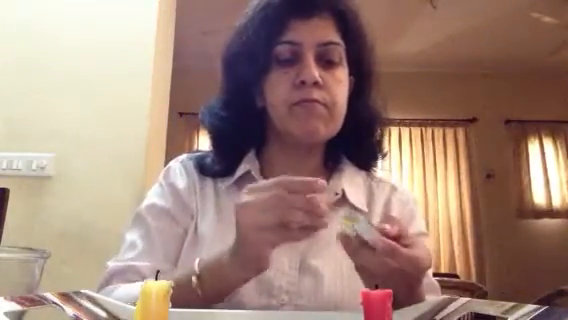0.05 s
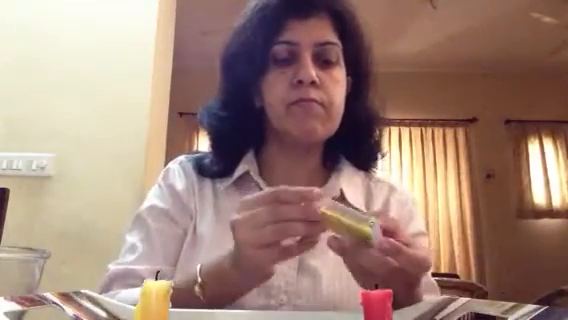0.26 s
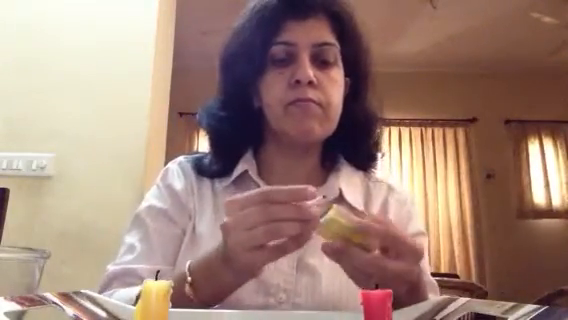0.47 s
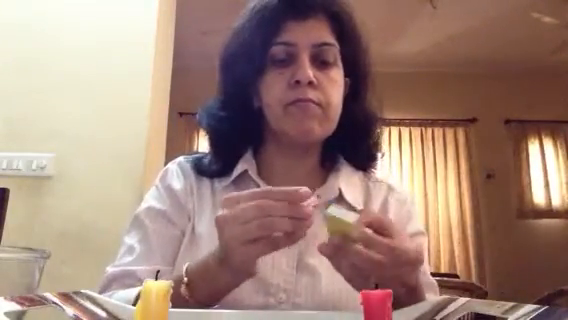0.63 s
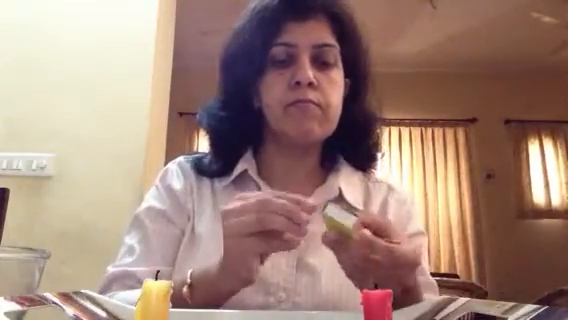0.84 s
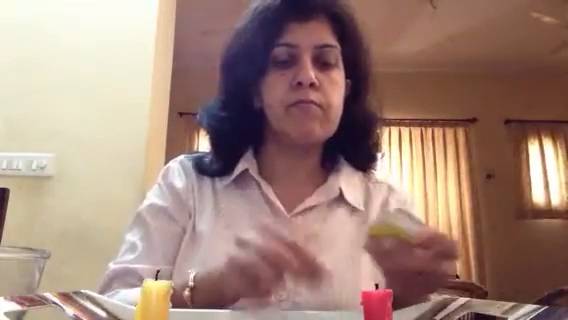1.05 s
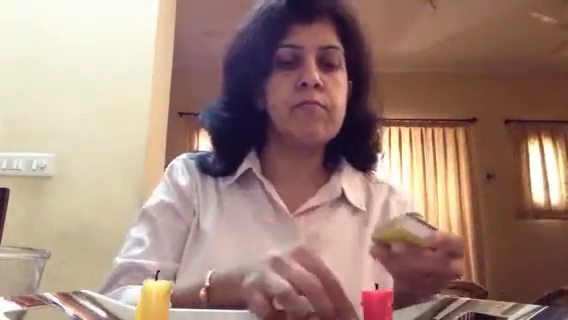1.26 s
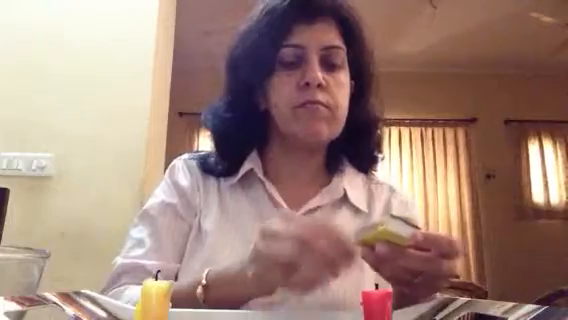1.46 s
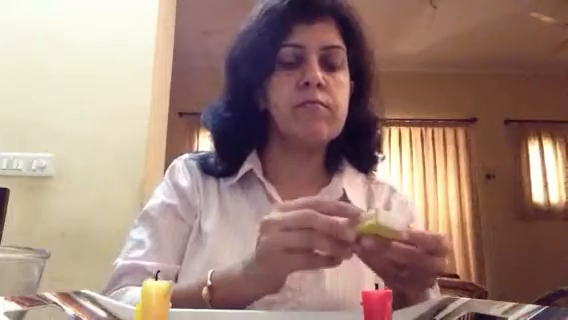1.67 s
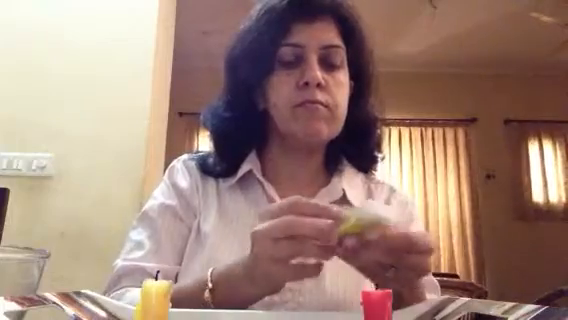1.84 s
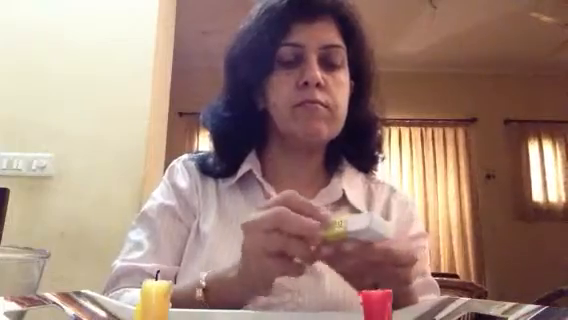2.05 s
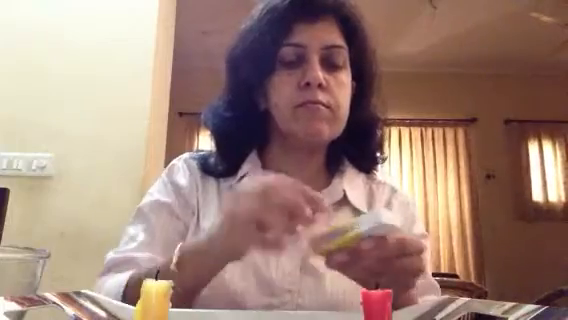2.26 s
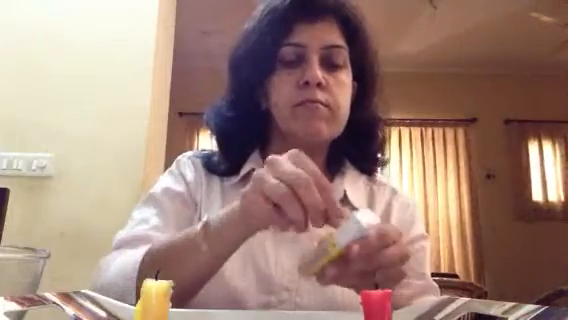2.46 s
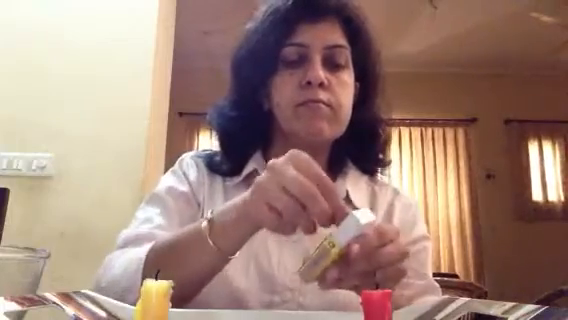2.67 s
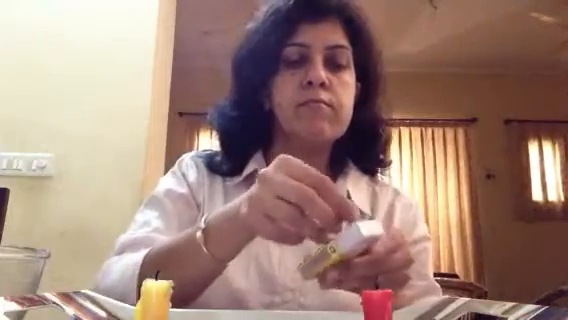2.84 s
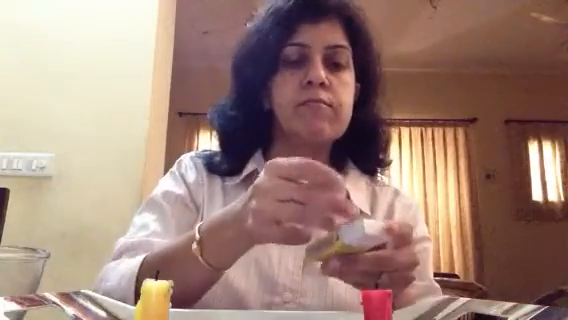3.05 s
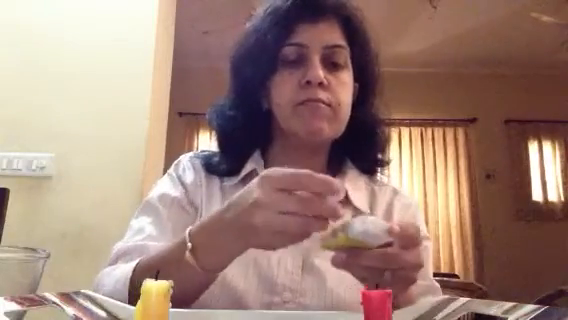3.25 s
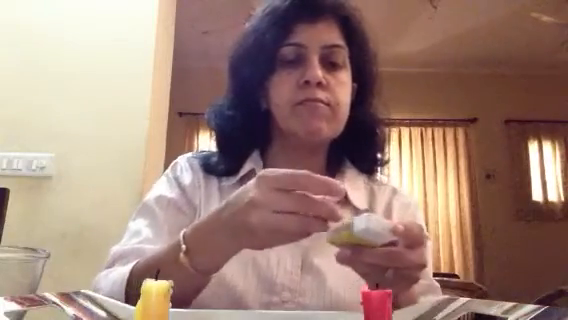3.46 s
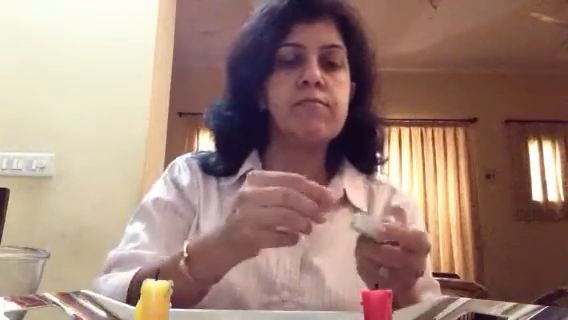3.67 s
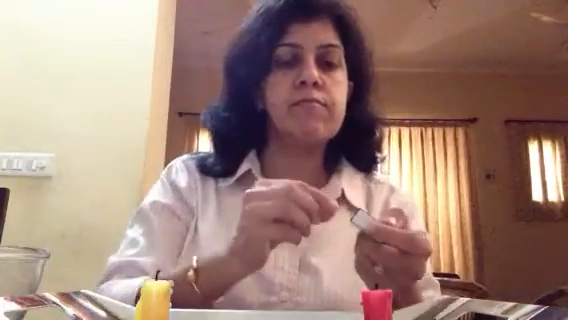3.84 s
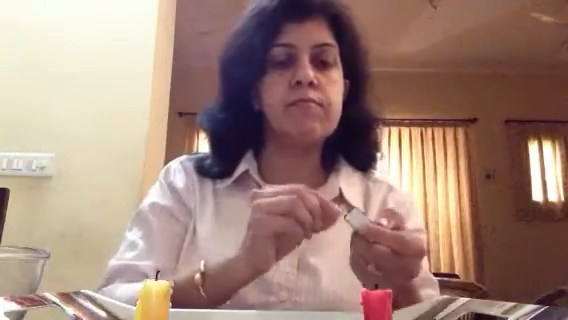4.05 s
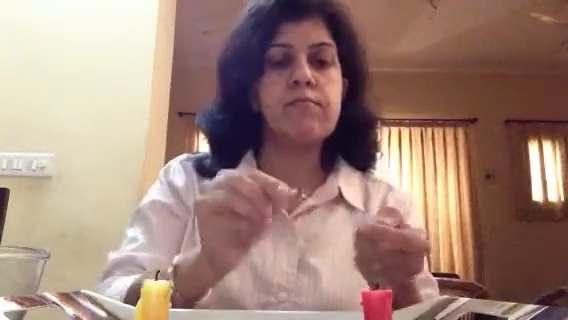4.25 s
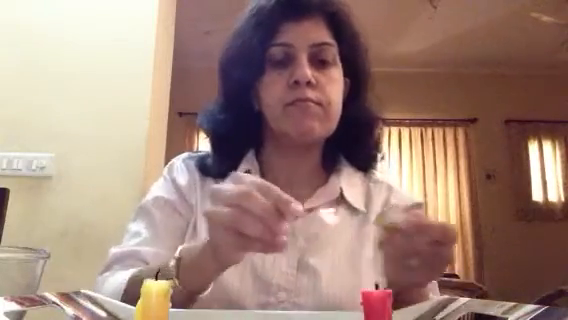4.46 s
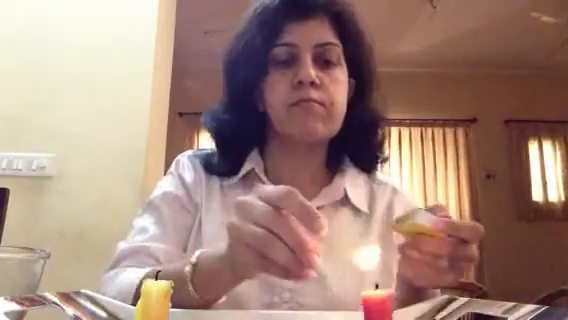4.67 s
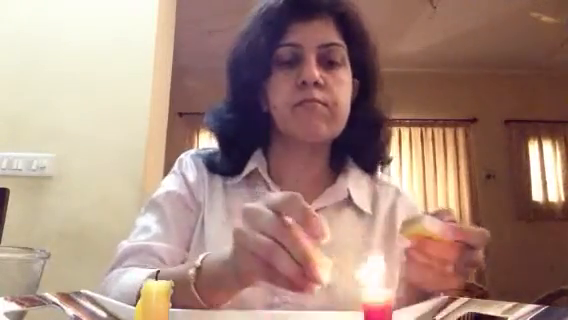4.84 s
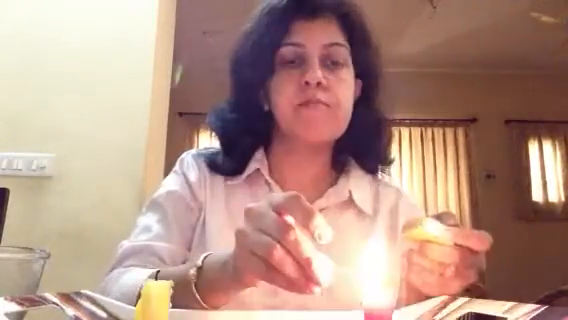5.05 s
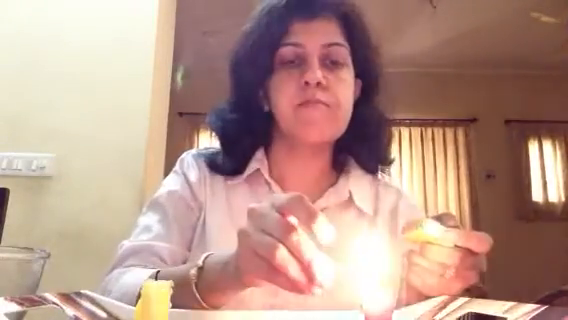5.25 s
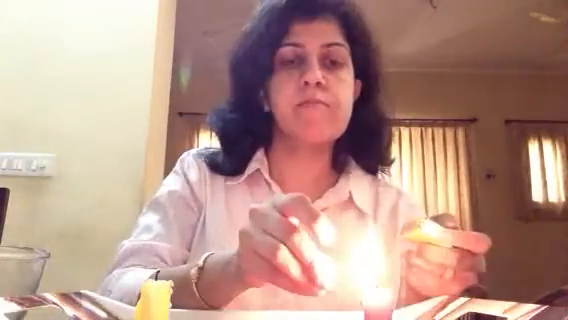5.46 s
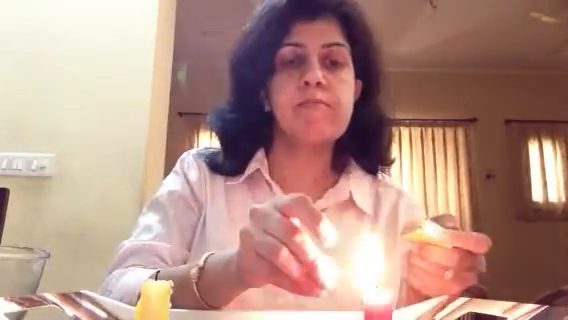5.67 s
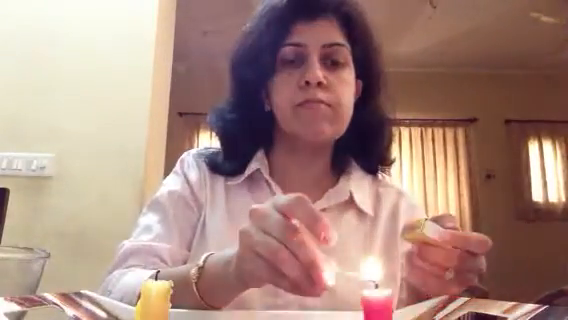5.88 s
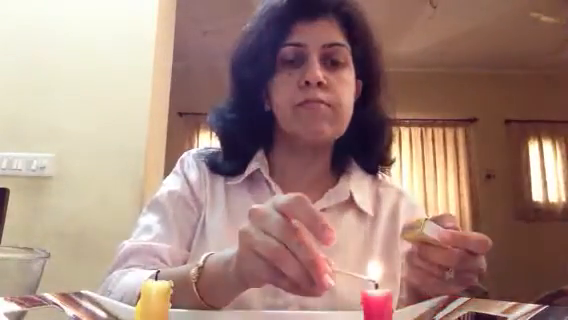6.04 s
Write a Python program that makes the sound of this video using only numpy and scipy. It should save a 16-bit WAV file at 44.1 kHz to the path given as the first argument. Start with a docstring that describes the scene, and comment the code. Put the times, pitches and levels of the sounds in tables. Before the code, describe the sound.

Small cardboard clicks and rubs lead to one sharp match strike, a brief fizz and a quietly crackling flame indoors.

```python
"""At a table in a hard-walled room, fingers rub and tap a cardboard matchbox, slide it open and pick a match.
The head snaps over the striker with a sharp crack, fizzes, burns with a fine hiss of escaping gas
and dies down in tiny crackles as a candle wick catches with a soft whoosh.
Behind it water sloshes in even strokes, like a washing machine in the next room,
over the murmur of the house, a thin motor whine and a brief, faint whistle."""
import sys
import numpy as np
from scipy import signal
from scipy.fft import rfft, irfft
from scipy.io import wavfile
from scipy.ndimage import uniform_filter1d

SR = 44100
rng = np.random.default_rng(int(sys.argv[2]) if len(sys.argv) > 2 else 0)


def store_wav(level_fs):
    """Save 16-bit WAV to argv[1]."""
    pcm = np.round(np.clip(np.atleast_2d(level_fs), -1, 1) * 32767)
    wavfile.write(sys.argv[1], SR, pcm.T.astype(np.int16))


N = 269362

# resonances (pitches it likes to ring at) of the box gripped for the strike: f/Hz, width/Hz, level/dB
GRIPPED_BOX_MODES = [(950, 90, -3.5), (1290, 130, 5), (1810, 260, 3)]


def undb(db):
    """Turn decibels into a factor to multiply by."""
    return 10 ** (np.asarray(db) / 20)


def unit(x):
    """Scale a signal to an average strength (rms) of one."""
    return x / np.sqrt(np.mean(x ** 2))


def walk(rate):
    """A random curve that glides to a new value `rate` times a second, with a spread near one."""
    step = int(SR / rate)
    stairs = np.repeat(rng.standard_normal(N // step + 1), step)
    return unit(uniform_filter1d(stairs, step)[:N])


def add(track, start, sound):
    """Mix a sound into a track at a time in seconds."""
    i = int(start * SR)
    track[i:i + len(sound)] += sound[:N - i]


def colour(x, points, size=4096):
    """Shape bass and treble along a curve of (f/Hz, level/dB) points; only the curve's shape counts."""
    hz, db = np.transpose(points)
    f = np.maximum(np.arange(size // 2 + 1) * SR / size, 1)
    cepstrum = irfft(np.log(undb(np.interp(np.log(f), np.log(hz), db))))
    cepstrum[1:size // 2] *= 2  # folded forward, so the filter never rings before a sound
    cepstrum[size // 2 + 1:] = 0
    response = irfft(np.exp(rfft(cepstrum)))
    return signal.fftconvolve(x, response / np.linalg.norm(response))[:N]


def ring(x, modes):
    """Let a signal ring an object's resonances, given as (f/Hz, width/Hz, level/dB)."""
    return sum(undb(db) * signal.lfilter(*signal.iirpeak(hz, hz / width, fs=SR), x)
               for hz, width, db in modes)


def grit(spread_db):
    """Grainy noise: dense tiny clicks of uneven size, none far above the rest."""
    size = np.minimum(rng.standard_normal(N), 2)
    return unit(rng.standard_normal(N) * undb(spread_db * size))


def swell(middle, half_length):
    """A bell-shaped rise and fall in loudness; times in seconds."""
    return np.exp(-((np.arange(N) / SR - middle) / half_length) ** 2 / 2)


def envelope(start, attack, hold, release, sag):
    """Loudness rises straight, sinks by `sag` dB a second while held, then dies away; times in seconds."""
    age = np.arange(N) / SR - start
    held = np.maximum(age - attack, 0)
    rise = np.clip(age / attack, 0, 1)
    return rise * undb(-sag * np.minimum(held, hold)) * np.exp(-np.maximum(held - hold, 0) / release)


def scatter(start, end, per_s, db, spread_db):
    """List (t/s, level/dB) of small events, each at a random moment in its own slice of the span."""
    count = max(int((end - start) * per_s), 1)
    chance = rng.random((64, 2))[:count]
    return [(start + (end - start) * (k + when) / count, db + spread_db * (2 * size - 1))
            for k, (when, size) in enumerate(chance)]


def house():
    """The house murmurs steadily, with the thin whine of a motor."""
    # tone of the murmur: f/Hz, level/dB
    murmur_tone = [(18, -86), (30, -76.5), (111, -10.5), (237, -3.5), (359, -4.5), (443, -11), (505, -16),
                   (639, -14.5), (1170, -23), (1820, -25.5), (2180, -28), (2620, -25.5), (2990, -29),
                   (15500, -31.5)]
    # pitches of the motor: f/Hz, width/Hz, level/dB
    motor_modes = [(451, 3.45, -19), (1450, 12, -3), (1790, 7.4, 9), (2088, 17, 1.5), (2160, 14.7, -7)]
    whine = unit(ring(rng.standard_normal(N), motor_modes))
    murmur = colour(rng.standard_normal(N), murmur_tone)
    return undb(-61.5) * murmur + undb(-77.5) * whine


def rubs():
    """Paper fibres catch and slip under each slide; a firm finger also rings the box wall."""
    # fingers and tray sliding over cardboard: middle t/s, level/dB, half length/s, wall ring/dB
    slides = [(0.2, -71.5, 0.19, 13.5), (0.364, -55.5, 0.016, 10), (0.615, -62.5, 0.025, 13),
              (.686, -64, 0.018, 17.5), (1.558, -66, 0.011, 17), (1.717, -56, 0.027, 7),
              (1.865, -58, 0.03, 8), (2.015, -50.5, 0.028, -2), (2.166, -59.5, 0.029, 13.5),
              (2.54, -56, 0.071, 8), (2.84, -56.5, 0.035, 9), (3.05, -65, .018, 9), (3.14, -63.5, 0.035, 5),
              (3.744, -54.5, 0.082, -5), (3.801, -56.5, 0.022, 15.5)]
    # tone of the rubbing: f/Hz, level/dB
    rub_tone = [(500, -8), (1300, -2.5), (2600, 6), (4000, -1), (7000, 1.5), (12000, 2), (15500, -3)]
    # resonances of the box wall: f/Hz, width/Hz, level/dB
    wall_modes = [(1296, 150, -4), (1813, 260, 2), (2550, 130, -19)]
    fibres = grit(spread_db=4.5) * unit(undb(2.2 * walk(170)))
    on_surface, on_wall = np.zeros(N), np.zeros(N)
    for middle, db, half_length, wall_db in slides:
        pressure = undb(db) * swell(middle, half_length)
        on_surface += pressure
        on_wall += undb(wall_db) * pressure
    friction = colour(fibres * on_surface, rub_tone)
    return undb(-4) * friction + undb(-1) * ring(fibres * on_wall, wall_modes)


def contacts(hits, tone, box_modes, scuff, drag_share, body_db):
    """Each hit drags briefly, snaps and scuffs to rest, ringing the cardboard and a matchstick."""
    # resonances of a matchstick: multiple of its pitch, width/Hz, level/dB
    stick_modes = [(1, 620, 4), (1.39, 990, -1.5)]
    edge, body, sticks = np.zeros(N), np.zeros(N), np.zeros(N)
    snap = SR // 40  # the sample where the drag ends
    t = np.arange(-snap, snap) / SR
    for when, db, length, box_db, tilt_db, stick_hz, stick_db in hits:
        fade_s = np.where(t < 0, drag_share * length, length)
        push = scuff * rng.standard_normal(len(t)) * np.exp(-np.abs(t) / fade_s)
        push[snap] = 1
        grip = 1 + 0.027 * rng.uniform(-0.74, 1)  # the fingers detune the box a little each time
        box = [(hz * grip, width, level + tilt_db * np.log2(hz / 1900)) for hz, width, level in box_modes]
        stick = [(stick_hz * ratio, width, level) for ratio, width, level in stick_modes]
        add(edge, when + t[0], undb(db) * push)
        add(body, when + t[0], undb(db + box_db) * ring(push, box))
        add(sticks, when + t[0], undb(db + stick_db) * ring(push, stick))
    return colour(edge, tone) + undb(body_db) * body + sticks


def clicks():
    """Tray and matches catch, then snap against the box; the fingers tick lightly on it in between."""
    # tray and matches hitting the box:
    # t/s, level/dB, scuff length/s, box ring/dB, box treble tilt/(dB per octave), stick f/Hz, stick ring/dB
    snaps = [(.581, -50.5, 0.0014, 12, -6, 5600, -5), (.665, -52, 0.0018, 9, -7, 5400, -4),
             (.688, -50.5, 0.0017, 11, -10, 5400, -4), (.711, -47, .0012, 4, -9, 5200, -1),
             (1.3748, -28, .0013, -15, -8, 5600, -13), (1.433, -31.5, 0.0023, -16, -8, 4750, -14),
             (1.491, -42.5, .002, -14, 0, 4750, 1), (1.909, -33, 0.0043, -0.5, -4, 6700, -4),
             (1.928, -26, 0.0018, -7, 4, 5400, 2), (1.9321, -20.5, 0.0011, -8, 8, 5450, 4),
             (1.9359, -25, 0.0015, -12, 5, 7000, 7.5), (2.4657, -41.5, 0.0021, 5, 6, 5400, 13),
             (2.4774, -31.5, .0026, 6, -5, 5170, 11.5), (2.545, -45, 0.0026, 9.5, -7, 5600, 3),
             (2.6, -45, 0.0019, -6, 0, 8900, 7), (2.6776, -22.5, 0.0022, -10, 12, 7100, 1.5),
             (2.742, -36, 0.0015, 3.5, -7, 5600, 1), (3.018, -45.5, .0018, 4, 5, 5500, 11),
             (3.047, -53, 0.0042, 9, 13, 4300, 8), (3.178, -51, 0.0044, 7, 3, 4600, 1),
             (3.919, -50, .002, 7, 0, 5500, -6), (4.002, -50.5, .0015, 6.5, -5.5, 5600, 0),
             (4.027, -50, .0015, 7, -2, 4600, -2)]
    # spells when the fingers work the box: from t/s, to t/s
    handling = [(.05, 0.74), (1.45, 1.7), (2.5, 3.2), (3.85, 3.96)]
    # tone of a click: f/Hz, level/dB
    click_tone = [(150, -20), (600, -2), (1200, -5.5), (3700, -2), (5500, 0.5), (7200, 3), (8800, 0),
                  (12500, 1.2), (15500, 0)]
    # resonances of the loosely held box: f/Hz, width/Hz, level/dB
    loose_box_modes = [(980, 74, -6), (1656, 160, -4), (1970, 330, 2.5), (2554, 380, -1),
                       (3180, 1200, -20.5)]
    # a longer, softer catch comes just before each snap, and stands out more the firmer the snap is
    lead_s, stretch, firm_db = 0.0042, 2.75, -17.5
    catches = [(when - lead_s, db - 8 + 0.5 * (db - firm_db), length * stretch, *timbre)
               for when, db, length, *timbre in snaps]
    ticks = [(when, db, 0.003, 9.5, 0, 6000, -1)  # same columns as the snaps
             for start, end in handling
             for when, db in scatter(start, end, per_s=14, db=-58.5, spread_db=-0.5)]
    hits = snaps + catches + ticks
    box = undb(-3) * contacts(hits, click_tone, loose_box_modes, scuff=0.46, drag_share=0.38, body_db=10)
    bass_cut = signal.butter(2, 590, "high", fs=SR, output="sos")  # a small box gives off little bass
    return signal.sosfilt(bass_cut, box)


def washer():
    """Each stroke throws a splash, while the water heaves in the hollow tub and settles."""
    # strokes of the washer: t/s, heave/dB, splash/dB, sag of the heave/(dB per s)
    strokes = [(0.287, -48.5, -64, 29.5), (1.137, -47.5, -59, 32), (1.979, -49, -60, 24),
               (2.791, -49.5, -59, 26.5), (3.627, -52, -61.5, 17), (4.5, -53.5, -64.5, 17),
               (5.345, -47, -77, 31.5)]
    # tones of the heaving water and of the splash: f/Hz, level/dB
    slosh_tone = [(50, -25.5), (85, -27), (115, -7.5), (220, -6), (300, 0.5), (430, -3.5), (540, -8.5),
                  (800, -10), (1200, -22.5), (2500, -25), (8000, -42.5)]
    splash_tone = [(400, -7), (900, 7.5), (2500, -2), (5000, -3), (9000, -6.5), (11000, -12.5),
                   (15000, -24)]
    # hollow resonances of the tub: f/Hz, width/Hz, level/dB
    tub_modes = [(226.2, 41, -2.5), (302, 39, -3.5), (387.6, 19.5, -1), (437.6, 15, 0.4), (672, 36, -8),
                 (804, 28, -5), (936, 22, -8)]
    t = np.arange(N) / SR
    water = rng.standard_normal(N) * undb(0.7 * walk(24.98))
    hollow = unit(ring(ring(water, tub_modes), tub_modes))
    slosh = unit(unit(colour(water, slosh_tone)) + undb(-2.5) * hollow)
    heave, spray = np.zeros(N), np.zeros(N)
    for when, heave_db, splash_db, sag in strokes:
        heave += undb(heave_db) * envelope(when - 0.029, attack=0.14, hold=0.36, release=0.14, sag=sag)
        onset = np.clip((t - when) / 0.019, 0, 1)
        spray += undb(splash_db) * onset * np.exp(-((t - when - 0.09) / 0.26) ** 2)
    return heave * slosh + spray * colour(grit(spread_db=6.5), splash_tone)


def whistle():
    """A thin, distant tone wavers, sinks a little and fades."""
    middle_s, pitch_hz, fall_hz_per_s = 1.9, 1042, 72
    age = np.arange(N) / SR - middle_s
    phase = 2 * np.pi * (pitch_hz * age - fall_hz_per_s * age ** 2 / 2) + 0.5 * walk(30)
    return undb(-67.5 + 2 * walk(20)) * swell(middle_s, half_length=0.4) * np.sin(phase)


def knocks():
    """Tray judders, hand knocks and pops of the match head: each is a dull rattle and a fading tone."""
    # the tray juddering against its sleeve: t/s, level/dB, f/Hz
    judders = [(1.906, -38, 2480), (1.925, -33, 2690), (1.9283, -30.5, 2370), (1.936, -29, 2570)]
    # the hand bumping the box: t/s, level/dB, share of the full ring time
    bumps = [(2.435, -37, 0.42), (2.743, -47, .5), (4.8683, -30, 0.89)]
    # tones a bump sets ringing: f/Hz, level/dB, ring time/s
    bump_modes = [(604, -14.5, 0.021), (970, -7, 0.0078), (1122, -3, 0.0084), (1340, -11, 0.0071),
                  (1865, -5, 0.0034), (2250, -8, .003), (2790, -5, 0.0028), (4100, -11, .003),
                  (5000, -11, .003)]
    # dull pops of the head as it lights: t/s, level/dB, f/Hz
    pops = [(4.217, -25, 1510), (4.249, -34, 1500), (4.273, -30.5, 1370), (4.316, -33, 1710),
            (4.342, -31.5, 760)]
    pop_ring_s, judder_ring_s = 0.0018, 0.0042
    notes = [(when, db + mode_db, hz, share * ring_s)
             for when, db, share in bumps for hz, mode_db, ring_s in bump_modes]
    notes += [(*pop, pop_ring_s) for pop in pops]
    notes += [(*judder, judder_ring_s) for judder in judders]
    track, t = np.zeros(N), np.arange(SR // 2) / SR
    for when, db, hz, ring_s in notes:
        noise = signal.lfilter(*signal.iirpeak(hz, 1.3, fs=SR), rng.standard_normal(len(t)))
        rattle = unit(noise) * np.exp(-t / 0.0044)
        tone = np.sin(2 * np.pi * (hz * t + rng.random()))
        add(track, when, undb(db) * np.exp(-t / ring_s) * (0.51 * tone + 0.26 * rattle))
    return track


def strike():
    """The match head snaps over the striker and rings the gripped box: one sharp crack."""
    # snaps of the head:
    # t/s, level/dB, scuff length/s, box ring/dB, box treble tilt/(dB per octave), stick f/Hz, stick ring/dB
    snaps = [(4.1764, -6.5, 0.0011, 0, 3, 4700, -6.5), (4.1794, -0.5, 0.00054, -7, -0.5, 9000, -13),
             (4.1801, -9.5, 0.0041, -6.5, 19, 9200, -2)]
    # tone of the crack: f/Hz, level/dB
    crack_tone = [(80, -47), (250, -13.5), (600, -9.5), (1500, -2), (3500, -6), (6000, -3.5), (8500, 0),
                  (13500, 3.5), (15500, 0)]
    crack = contacts(snaps, crack_tone, GRIPPED_BOX_MODES, scuff=0.15, drag_share=0.067, body_db=-2.5)
    return undb(3) * crack


def ignition():
    """The tip flashes in a bright fizz that rings the box, then smoulders and spits as the fire spreads."""
    # spits of the head: middle t/s, level/dB, half length/s
    spits = [(4.445, -57, 0.005), (4.473, -61, 0.004), (4.523, -54.5, 0.004)]
    # tones of the fizz and of the smoulder: f/Hz, level/dB
    fizz_tone = [(80, -37), (250, 7), (700, -11), (1500, -9.5), (2250, -4), (3200, -2), (6000, -7.5),
                 (8500, 1), (13500, -0.5), (15300, 1.5), (17000, -10)]
    smoulder_tone = [(80, -24), (300, 7.5), (950, 6), (1300, -1), (1900, 3), (3400, -8.5), (5300, 0),
                     (8000, 2), (10400, 1), (11800, -7), (15000, -5)]
    rasp = undb(1.8 * walk(260))
    chatter = unit(undb(3.5 * walk(140)))
    flash = undb(-38) * envelope(4.191, attack=0.009, hold=0.0059, release=0.0046, sag=0)
    fizz = undb(-45) * envelope(4.178, attack=0.0046, hold=0.1, release=0.067, sag=29)
    burst = grit(spread_db=3.5) * rasp * (flash + fizz)
    box = undb(2.5) * ring(burst * chatter, GRIPPED_BOX_MODES)
    glow = undb(-57) * envelope(4.36, attack=0.05, hold=0.16, release=0.1, sag=8) * undb(1.5 * walk(150))
    spitting = sum(undb(db) * swell(middle, half_length) for middle, db, half_length in spits)
    smoulder = colour(grit(spread_db=5.5) * (glow + spitting), smoulder_tone)
    return colour(burst, fizz_tone) + box + smoulder


def flare():
    """Gas sizzles out of the burning head over a soft roar, sputtering more as the head burns out."""
    # tones of the hiss and of the roar: f/Hz, level/dB
    hiss_tone = [(200, -15), (450, 4), (620, 11), (780, 5.5), (950, 9.5), (1350, -2.5), (1650, 3),
                 (1880, 8), (2200, -0.5), (2850, 3.5), (4100, -6.5), (4550, -2), (5000, -4), (6500, -1.5),
                 (7350, 2.5), (7950, -1.5), (8700, 3), (9200, 1), (9950, 3.5), (11000, 1), (15500, -1.5)]
    roar_tone = [(85, -38), (130, -13), (230, 2), (330, -11.5), (1000, -31)]
    burning_out = envelope(5.2, attack=0.079, hold=1, release=1, sag=0)
    sputter = undb((1.1 + 1.5 * burning_out) * walk(110) + 0.8 * walk(35))
    blaze = undb(-51) * envelope(4.545, attack=0.11, hold=0.78, release=0.085, sag=4.2)
    draught = undb(-52) * envelope(4.55, attack=0.088, hold=1.4, release=0.1, sag=16)
    hiss = colour(grit(spread_db=6) * blaze * sputter, hiss_tone)
    roar = draught * colour(rng.standard_normal(N), roar_tone)
    return hiss + roar


def crackles():
    """Each crackle is a click and a tiny puff of gas; faint ones fall at random, loud ones come last."""
    # loudest crackles of the dying head: t/s, level/dB
    loud = [(5.3572, -39), (5.3917, -33), (5.474, -32.5), (5.539, -37), (5.5652, -31.5), (5.6066, -33.5),
            (5.624, -32), (5.642, -38.5), (5.717, -45), (5.745, -48), (5.7815, -42), (5.8052, -45)]
    faint = scatter(3.9, 5.6, per_s=14, db=-45, spread_db=6)
    track, t = np.zeros(N), np.arange(SR // 20) / SR
    for when, db in loud + faint:
        puff = 0.13 * rng.standard_normal(len(t)) * np.exp(-t / 0.0044)
        puff[0] = 1  # the click
        add(track, when, undb(db) * puff)
    return colour(track, [(1000, -7), (4500, -10), (9500, -2), (15000, -4.5), (17000, -24)])


def wick():
    """The gas billows in a soft whoosh as the candle wick catches."""
    # tone of the whoosh: f/Hz, level/dB
    whoosh_tone = [(85, -40), (150, -3), (240, 1), (310, -4.5), (430, 4), (560, -4), (1000, -16),
                   (2500, -37)]
    return undb(-51.5) * swell(5.48, half_length=0.06) * colour(rng.standard_normal(N), whoosh_tone)


def room(x, tail_db, echo_s, echo_db, build_s):
    """The table top sends back one early echo; the walls add a wash of echoes that builds and fades."""
    # the room's echo tail, band by band: f/Hz, time to fade by 60 dB/s, level/dB
    bands = [(250, 0.64, -11), (700, 0.29, 2), (1500, 0.41, -1.5), (3060, 0.53, 1.5), (5900, 0.57, -3.5),
             (10000, 0.33, -6.5), (14000, 0.38, -4.5)]
    t = np.arange(SR * 3 // 4) / SR
    f = np.maximum(np.fft.rfftfreq(len(t), 1 / SR), 1)
    noise = rfft(rng.standard_normal(len(t)))
    centres = np.log([row[0] for row in bands])
    response = np.zeros(len(t))
    for (_, fade_s, db), share in zip(bands, np.eye(len(bands))):
        band = irfft(noise * np.interp(np.log(f), centres, share), len(t))
        response += undb(db + tail_db) * band * np.exp(-np.log(1000) * t / fade_s)
    response *= 1 - np.exp(-t / build_s)
    add(response, echo_s, undb([echo_db]))
    return x + signal.fftconvolve(x, response)[:N]


def scene():
    """The box and the match are close by, the flame nearer the table top, the household behind."""
    behind = washer() + house() + whistle()
    matchbox = strike() + knocks() + rubs() + ignition() + clicks()
    hands = room(matchbox, tail_db=-35, echo_s=0.0032, echo_db=-9.5, build_s=0.0022)
    flame = room(flare() + crackles(), tail_db=-35.5, echo_s=0.0021, echo_db=-16, build_s=0.0024)
    return (hands + flame + wick() + behind)[None]


def record(dry):
    """The small microphone loses the deep bass; the recorder cuts the highest treble."""
    low_hz, top_hz = 93, 15450
    thin = signal.sosfilt(signal.butter(2, low_hz, "high", fs=SR, output="sos"), dry)
    return signal.sosfilt(signal.ellip(10, 0.2, 70, top_hz, fs=SR, output="sos"), thin)


dry = scene()
out = record(dry)
store_wav(out)
```